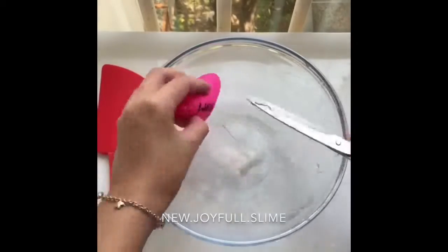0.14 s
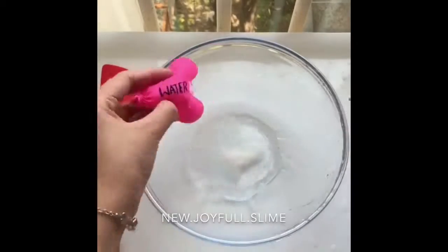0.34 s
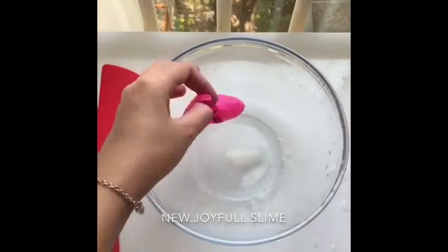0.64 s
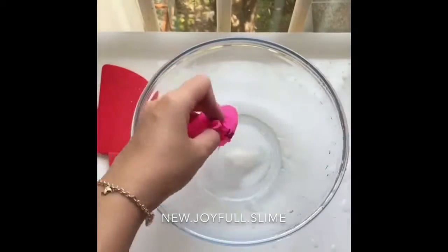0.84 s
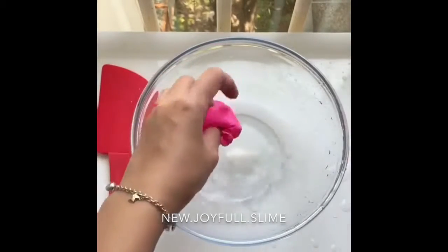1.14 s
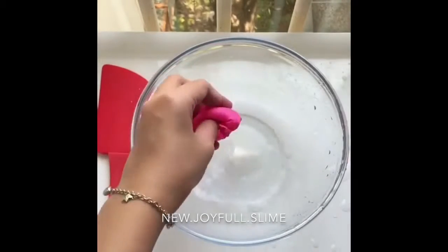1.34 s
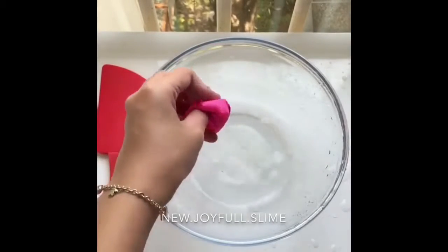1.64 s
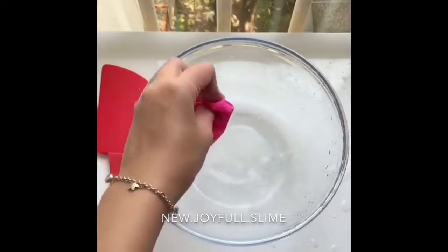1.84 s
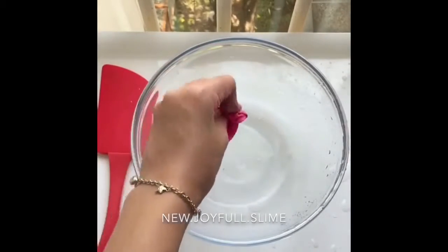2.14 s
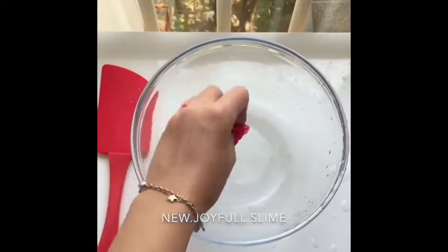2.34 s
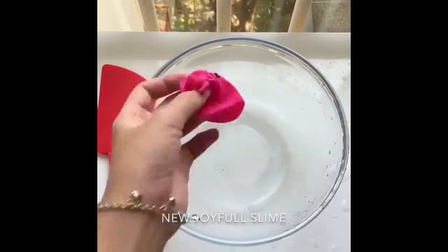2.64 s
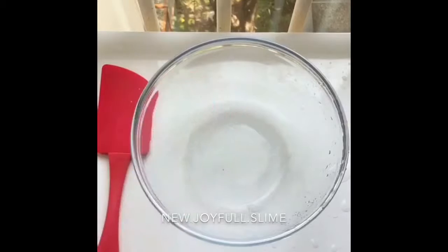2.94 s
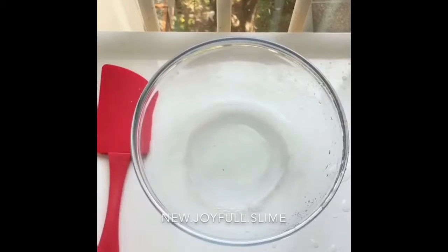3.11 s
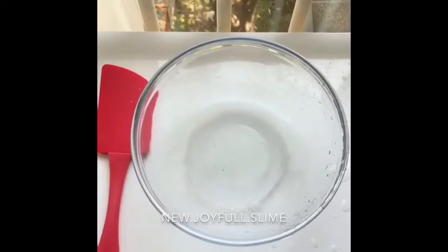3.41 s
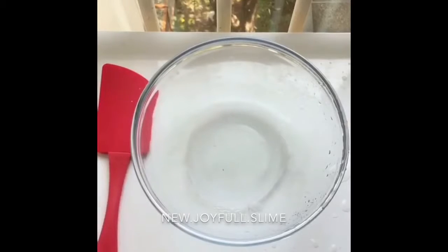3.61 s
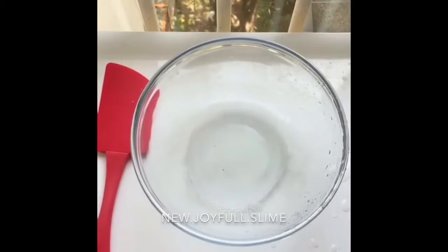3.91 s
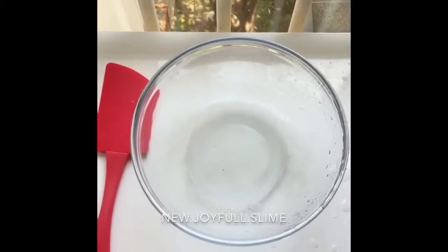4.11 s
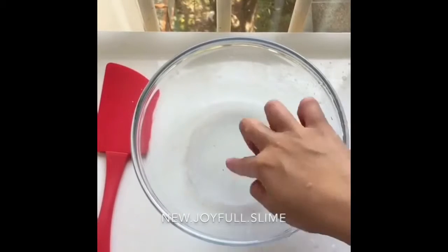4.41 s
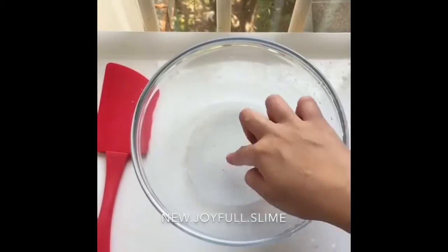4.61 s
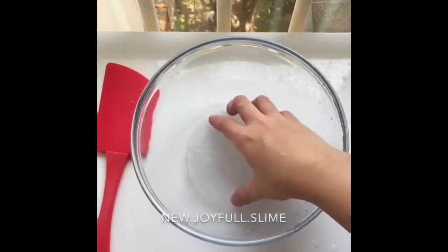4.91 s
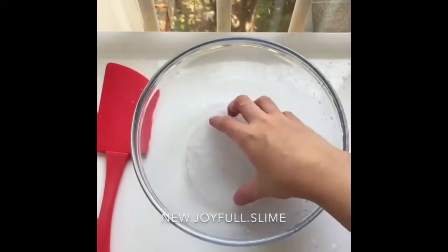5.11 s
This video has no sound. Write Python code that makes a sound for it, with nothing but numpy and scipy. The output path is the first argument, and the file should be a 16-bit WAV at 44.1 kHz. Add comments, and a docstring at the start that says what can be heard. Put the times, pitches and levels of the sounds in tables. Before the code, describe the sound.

A sharp snip releases a quick bubbly gush of water, then fizzy squelching squeezes, hard knocks on table and glass bowl, and brief hand rustles over a faint hum.

```python
"""In a small humming room, scissors snip a water-filled rubber ball over a glass bowl.
A gush of filtered noise carries a few loud bubbles, each a swelling, rising tone; then each squeeze
of the emptying skin presses out fizz (a swarm of tiny bubbles) and noise spits. Hard knocks ring modes
of table and bowl, soft bumps those of the table; a hand rustles and things slide as grainy noise."""
import sys
import numpy as np
from scipy import signal
from scipy.fft import irfft
from scipy.io import wavfile
from scipy.ndimage import uniform_filter1d

SR = 44100
rng = np.random.default_rng(int(sys.argv[2]) if len(sys.argv) > 2 else 0)


def int16_out(signal):
    """Quantize to a 16-bit WAV file."""
    q = np.round(np.clip(np.atleast_2d(signal).T, -1, 1) * 32767)
    wavfile.write(sys.argv[1], SR, q.astype(np.int16))


N = 231820
TIME_S = np.arange(N) / SR

# room noise spectrum: (frequency [Hz], relative level [dB])
AIR_SPECTRUM = [(30, 11), (55, -2.5), (80, 3.5), (160, 5), (210, -3.5), (330, 1), (470, -11.5), (800, -13),
                (1100, -21), (1500, -19), (2200, -20.5), (3300, -27), (6000, -31.5), (13500, -35.5)]
# motor tones: (multiple of motor speed, level [dB])
MOTOR_TONES = [(1, -55.5), (3, -67), (4, -56), (5, -61.5), (6, -82.5), (7, -73.5), (12, -69.5)]
# reverberation of the room: (frequency [Hz], t60 [s])
ROOM_DECAY = [(150, 0.13), (400, 0.3), (900, 0.17), (3000, 0.16), (8000, 0.1), (14000, 0.096)]
# crisp brushes of a hand: (time [s], level [dB], t60 [s], centre [Hz], half-width [octaves])
RUSTLES = [(3.619, -36, 0.055, 4000, 0.94), (3.822, -56, 0.025, 2970, 1), (3.9, -63, 0.45, 6500, 1.5),
           (4.2865, -28.5, 0.05, 8500, 3.5), (4.316, -35, 0.044, 10000, 1.1),
           (4.3262, -25, 0.036, 9200, 1.94), (4.3815, -30, 0.028, 10000, 1.8), (4.413, -46, 0.1, 8050, 2.6)]
# dull scrapes of things sliding on the table: (time [s], level [dB], t60 [s], centre [Hz])
SLIDES = [(.833, -42, 0.14, 375), (3.822, -37, 0.019, 550), (3.872, -44, .16, 565),
          (3.905, -49.5, 0.16, 626)]
# modes of the table top: (frequency [Hz], level [dB], t60 [s])
TABLE_MODES = [(97, -6, 0.061), (171.5, -12.5, 0.098), (234, -12, 0.062), (255.3, 0, 0.11),
               (296, -7, 0.049), (355.7, -4, 0.068), (420.4, -7, 0.051), (503, -16.5, 0.049),
               (701, -20.5, 0.14), (1097, -6.5, 0.061), (1340, 3.5, 0.026)]
# modes of the glass bowl: (frequency [Hz], level [dB], t60 [s])
BOWL_MODES = [(860, 2.5, 0.28), (1060, -8, 0.42), (1148, -14, 0.23), (1376, -12.5, 0.12),
              (1964, -1.5, 0.074), (2444, -13, 0.15)]
# soft bumps against the table: (time [s], thud level [dB], pitch [Hz], t60 [s], table level [dB])
BUMPS = [(3.571, -16.5, 110.6, 0.1, -23), (4.499, -18.5, 121, 0.099, -37), (4.522, -27, 159.6, 0.16, -36.5)]
# frequencies at which the clack levels of a knock are given: (frequency [Hz])
CLACK_HZ = [500, 1100, 3000, 10000]
# hard knocks on bowl or table: (time [s], four clack levels [dB] at CLACK_HZ, notch spacing [Hz],
# hollow resonance [Hz], its lift [dB], t60 [s], table level [dB], bowl level [dB])
KNOCKS = [(0.239, -11.5, -27.5, -50, -38, 2950, 716, 8.5, 0.093, -32.5, -40),
          (1.1042, -15.5, -22.5, -31.5, -47.5, 1700, 2060, 3, 0.042, -29.5, -45.5),
          (1.222, -15.5, -27.5, -31.5, -48, 1730, 1400, 6, 0.02, -47, -56),
          (2.7114, -10.5, -14, -18, -31, 1650, 2000, 2, 0.052, -14.5, -68),
          (2.9488, -7, -16, -22.5, -40, 2090, 3060, 5.5, 0.046, -25, -53),
          (3.0618, 2, -11.5, -16, -38, 1650, 1260, 10.5, 0.068, -6.5, -61),
          (4.0454, 0.5, -15, -18, -39.5, 1850, 2010, 18, 0.037, -51, -38.5)]
# slosh and flop of the rubber skin: (time [s], level [dB], t60 [s], centre [Hz])
SLOSHES = [(.115, -40.5, 0.25, 183), (.16, -33.5, 0.071, 262), (0.241, -39, 0.34, 157),
           (0.419, -42, 0.09, 188), (1.97, -47.5, 0.95, 179)]
# gush as the skin gives way: (time [s], level [dB], t60 [s], centre [Hz], half-width [octaves])
GUSH = [(.108, -24, 0.056, 6950, 1.5), (.1175, -10, 0.022, 4200, 2.2), (.125, -24, 0.18, 5400, 1.7),
        (.125, -27, 0.21, 2610, 0.28), (.161, -25, 0.062, 4160, 0.98)]
# spits of air and water from the cut: (time [s], level [dB], centre [Hz], half-width [octaves])
SPITS = [(.231, -39, 10000, .42), (0.432, -34.5, 1720, 1.06), (.451, -29, 3700, 1.04),
         (0.468, -32.5, 4030, 0.55), (.483, -31, 11700, 0.4), (.519, -35, 3150, 0.68),
         (1.229, -33, 12000, 0.16), (1.2397, -27, 12200, 0.14), (1.806, -29.5, 11000, 1.3),
         (1.936, -36, 7860, 1.3), (1.977, -31, 6460, 0.74), (1.9925, -26, 7900, 0.42),
         (2.0224, -36.5, 10000, 1.2), (2.257, -45, 3630, 0.8)]
# squeezes of the hand: (start [s], length [s], fizz level [dB], typical bubble pitch [Hz])
SQUEEZES = [(0.07, 0.066, -53, 6500), (0.213, 0.084, -49.5, 6000), (0.31, 0.023, -46, 7600),
            (0.358, 0.085, -57.5, 4930), (0.447, 0.03, -46, 4950), (0.715, 0.015, -50, 3670),
            (0.886, 0.019, -51, 7460), (0.924, 0.097, -62.5, 6000), (1.237, 0.012, -41.5, 12100),
            (1.28, 0.071, -57, 11500), (1.364, 0.016, -45, 5140), (1.452, 0.06, -50, 13500),
            (1.516, 0.055, -50.5, 8700), (1.6, 0.062, -55.5, 9050), (1.737, 0.29, -48, 9200),
            (1.892, .085, -40, 6250), (2.02, 0.056, -54, 6900), (2.132, 0.022, -57.5, 5800),
            (2.266, 0.021, -54, 3430), (2.471, 0.027, -57.5, 8000)]
# ringing notes of the glass bowl: (time [s], level [dB], pitch [Hz], swell time [s])
GLASS_NOTES = [(.242, -40, 4360, .019), (.24, -38, 2446, .022), (.24, -41.5, 1050, .016),
               (.485, -55, 4390, .03)]
# loudest air bubbles in the water: (time [s], level [dB], starting pitch [Hz])
BUBBLES = [(.109, -11.5, 3845), (0.1155, -12, 2627), (0.124, -18, 3000), (0.1625, -14.5, 2480),
           (0.182, -31, 2740), (0.4287, -37.5, 1757), (.459, -30, 3220), (1.326, -39, 7740),
           (1.371, -29, 3490), (1.531, -39.5, 4600), (1.58, -39, 7360), (1.779, -38, 3390),
           (1.8093, -26.5, 6600), (1.853, -23.5, 7500), (1.876, -30, 8200), (1.91, -35.5, 1886),
           (1.928, -44, 2610), (1.942, -28, 3900), (1.948, -25.5, 5960), (1.9562, -11, 12900),
           (1.975, -18.5, 7650), (1.983, -29.5, 4060), (2.055, -38, 3230), (2.086, -38, 4680)]
# bubbles as the ball empties: (time [s], swell [cycles], pitch rise per swell time [fraction])
EMPTYING = [(.1, 10.6, 0.005), (2.0, 5.4, 0.07)]

AIR_DB = -45.5
MOTOR_HZ, DRONE_HZ, DRONE_DB = 71.72, 95.95, -45  # the drone is the appliance's loudest tone
RUSTLE_RISE_PER_T60 = 0.024
SLIDE_RISE_PER_T60, SLIDE_OCTAVES = 0.086, 0.46
NOTCH_DEPTH = 0.8
SLOSH_RISE_PER_T60, SLOSH_OCTAVES = 0.1, 0.62
GUSH_RISE_PER_T60 = 0.034
SPIT_RISE_S, SPIT_T60_S = 0.0005, 0.015
SQUEEZE_RISE_S, SQUEEZE_T60_S = 0.003, 0.14
# the finer the fizz, the more alike its bubbles are in size
FINEST_HZ, SIZE_SPREAD, WIDEST_OCTAVES = 16900, 1.8, 1.84
# low notes of the glass swell a second time
LINGER_DB, LINGER_S, LINGER_BELOW_HZ = -13, 0.052, 3000
SCATTER_T60_S = 0.032
FIZZ_ECHO_DB, SPURT_ECHO_DB, BUBBLE_ECHO_DB = -8, -8.5, -12
MIC_LOW_HZ, MIC_HIGH_HZ = 62, 14050


def gain_of(db):
    """Decibels to amplitude."""
    return 10 ** (np.asarray(db) / 20)


def evened(x):
    """Scales to rms 1."""
    return x / np.sqrt(np.mean(x ** 2) + 1e-20)


def read(points, hz):
    """Reads a curve on a log-frequency axis."""
    point_hz, value = np.transpose(points)
    return np.interp(np.log(hz + 1), np.log(point_hz + 1), value)


def band(hz, centre_hz, octaves):
    """A soft bell on a log-frequency axis."""
    offset = np.log2((hz + 1) / centre_hz) / (2 * octaves)
    return 1 / (1 + offset ** 2) ** 4


def add(mix, time_s, sound):
    """Mixes a sound in at time_s."""
    part = mix[max(round(time_s * SR), 0):][:len(sound)]
    part += sound[:len(part)]


def soft_onset(t, rise_s):
    """Build-up from 0 to 1 that starts gently."""
    return 1 - np.exp(-(t / rise_s) ** 2)


def sharp_onset(t, rise_s):
    """Build-up from 0 to 1, steepest at the start."""
    return 1 - np.exp(-t / rise_s)


def noise(gain, size):
    """Noise of random phase whose spectrum is gain(Hz)."""
    hz = np.fft.rfftfreq(size, 1 / SR)
    phase = np.exp(2j * np.pi * rng.random(len(hz)))
    return irfft(gain(hz) * phase, size) * np.sqrt(size)


def swelling(rows, rise_per_t60):
    """Gives each puff a rise time in proportion to its decay."""
    return [(s, db, rise_per_t60 * t60_s, t60_s, *shape) for s, db, t60_s, *shape in rows]


def bursts(rows, grain_db):
    """Puffs of grainy noise, each with its own attack, decay and band."""
    out, t = np.zeros(N), TIME_S[:SR // 3]
    for time_s, db, rise_s, t60_s, centre_hz, octaves in rows:
        hiss = noise(lambda hz: band(hz, centre_hz, octaves), len(t))
        flicker = evened(uniform_filter1d(rng.standard_normal(len(t)), size=45))  # 1 ms grains
        envelope = soft_onset(t, rise_s) * gain_of(-60 * t / t60_s)
        grainy = evened(hiss * gain_of(grain_db * flicker))
        add(out, time_s, gain_of(db) * grainy * envelope / envelope.max())
    return out


def ring(modes, swell_s):
    """Sum of exponentially decaying sine modes with a common build-up."""
    t = TIME_S[:SR // 2]
    tones = sum(gain_of(db - 60 * t / t60_s) * np.sin(2 * np.pi * hz * t) for hz, db, t60_s in modes)
    return tones * soft_onset(t, swell_s)


def bubble(hz, swell_s, rise):
    """A tone that swells, dies away and climbs as the bubble nears the surface."""
    t = TIME_S[:int(8 * swell_s * SR) + 2]
    u = t / swell_s
    envelope = u ** 2 * np.exp(2 - 2 * u)
    return envelope * np.sin(2 * np.pi * hz * t * (1 + rise * u / 2))


def hum(waver=0.023, phase_waver_rad_per_hz=0.0028):
    """Motor tones, slightly wavering in level and phase, over soft room noise."""
    out = evened(noise(lambda hz: gain_of(read(AIR_SPECTRUM, hz)), N)) * gain_of(AIR_DB)
    tones = [(DRONE_HZ, DRONE_DB)] + [(round(k) * MOTOR_HZ, db) for k, db in MOTOR_TONES]
    for hz, db in tones:
        drift = evened(noise(lambda f: np.exp(-f / 0.93), N))  # mostly below a few Hz
        phase = 2 * np.pi * (hz * TIME_S + rng.random()) + phase_waver_rad_per_hz * hz * drift
        out += np.sqrt(2) * gain_of(db) * (1 + waver * drift) * np.sin(phase)
    return out


def room(x):
    """Dense reflections from near walls, each band dying at its own speed."""
    hz, t, z = signal.stft(rng.standard_normal(SR // 2), SR, nperseg=256)
    decay = gain_of(-60 * t / read(ROOM_DECAY, hz)[:, None])
    tail = signal.istft(z * decay, SR, nperseg=256)[1]
    tail *= soft_onset(TIME_S[:len(tail)], 0.0033)
    return signal.fftconvolve(x, tail / np.linalg.norm(tail))[:N]


def handling():
    """A hand brushing past and things sliding on the table, as grainy friction noise."""
    rustles = swelling(RUSTLES, RUSTLE_RISE_PER_T60)
    slides = swelling([(*row, SLIDE_OCTAVES) for row in SLIDES], SLIDE_RISE_PER_T60)
    return bursts(rustles, grain_db=5.0) + bursts(slides, grain_db=5.0)


def bumps(rumble_db=-21, rumble_rise_s=0.0093, rumble_t60_s=0.34, rumble_hz=230, rumble_octaves=0.34):
    """A soft thud rings the low modes of the table and leaves a short rumble."""
    rumble = (rumble_rise_s, rumble_t60_s, rumble_hz, rumble_octaves)
    out = bursts([(s, db + rumble_db, *rumble) for s, db, *_ in BUMPS], grain_db=1.5)
    for time_s, db, hz, t60_s, table_db in BUMPS:
        thud = gain_of(db) * ring([(hz, 0, t60_s)], 0.005)
        add(out, time_s, thud + gain_of(table_db) * ring(TABLE_MODES[:6], 0.0021))
    return out


def knocks(lift_octaves=0.23, tail_db=-16, tail_t60_s=0.22, bass_hz=230, table_swell_s=0.0093,
           rebound_db=-6, rebound_s=0.0096, wall_db=-17.0):
    """A hard clack, hollowed by a quick inverted reflection, rebounds and rings table and bowl."""
    out, t = np.zeros(N), TIME_S[:SR // 2]
    table = ring(TABLE_MODES, table_swell_s)
    bowl = ring(BOWL_MODES, 0.00072)
    for time_s, *colour_db, notch_hz, hollow_hz, lift_db, t60_s, table_db, bowl_db in KNOCKS:
        def plain(hz):
            """Broad colour of the blow, bass reduced."""
            colour = gain_of(read(list(zip(CLACK_HZ, colour_db)), hz))
            return colour * hz ** 2 / (hz ** 2 + bass_hz ** 2)

        def hollow(hz):
            """The same with the struck thing's resonance and notches."""
            lift = lift_db * np.exp(-(np.log2((hz + 1) / hollow_hz) / lift_octaves) ** 2)
            # long waves bend round the reflecting edge
            depth = NOTCH_DEPTH * hz ** 2 / (hz ** 2 + (notch_hz / 2) ** 2)
            notches = abs(1 - depth * np.exp(2j * np.pi * hz / notch_hz))
            return plain(hz) * gain_of(lift) * notches

        clack = noise(hollow, len(t)) * gain_of(-60 * t / t60_s) * sharp_onset(t, 0.0005)
        rattle = noise(plain, len(t)) * gain_of(tail_db - 60 * t / tail_t60_s) * sharp_onset(t, 0.0073)
        rebound = noise(hollow, len(t)) * gain_of(rebound_db - 60 * t / 0.013)
        add(out, time_s, clack + rattle + gain_of(bowl_db) * bowl)
        add(out, time_s + rebound_s, rebound)
        add(out, time_s + 0.00555, gain_of(table_db) * table)  # the heavy top answers late
        add(out, time_s + 0.0257, gain_of(table_db + wall_db) * table)  # a wall returns its boom
    return out


def in_bowl(x, echo_db):
    """The glass wall scatters each splash into a few milliseconds of close echoes."""
    t = TIME_S[:SR // 20]
    echoes = rng.standard_normal(len(t)) * gain_of(-60 * t / SCATTER_T60_S) * sharp_onset(t, 0.00086)
    scattered = signal.fftconvolve(x, echoes / np.linalg.norm(echoes))[:N]
    return (x + gain_of(echo_db) * scattered) / np.sqrt(1 + gain_of(echo_db) ** 2)


def fizz(low_hz=1900, high_hz=13500, pops_per_s=4200, swell_cycles=1.86, spread_db=3.5, clump_db=3.5,
         ring_spread_octaves=0.25):
    """A swarm of tiny bursting bubbles of many sizes; each squeeze builds quickly, holds and lets go."""
    pitches_hz = np.geomspace(low_hz, high_hz, num=40)
    start_s, length_s, db, centre_hz = np.transpose(SQUEEZES)[:, :, None]
    t = np.maximum(TIME_S - start_s, 0)
    release_db = 60 * np.maximum(t - length_s, 0) / SQUEEZE_T60_S
    pressure = sharp_onset(t, SQUEEZE_RISE_S) * gain_of(db - release_db)
    octaves = np.minimum(SIZE_SPREAD * np.log2(FINEST_HZ / centre_hz), WIDEST_OCTAVES)
    share = pitches_hz * band(pitches_hz, centre_hz, octaves) ** 2
    share /= share.sum(axis=1, keepdims=True)
    swarm = np.zeros(N)
    for hz, power in zip(pitches_hz, share.T @ pressure ** 2):
        hits = rng.random(N) < pops_per_s / len(pitches_hz) / SR
        pops = hits * gain_of(spread_db * np.minimum(rng.exponential(1, N), 4))
        # ring length varies a little from pitch to pitch
        swell_s = swell_cycles / hz * 2 ** (ring_spread_octaves * (2 * rng.random() - 1))
        chirps = signal.oaconvolve(pops, bubble(hz, swell_s, 0.022))[:N]
        swarm += np.sqrt(power) * evened(chirps)
    clumps = evened(uniform_filter1d(rng.standard_normal(N), size=200))  # 4.5 ms
    return swarm * evened(gain_of(clump_db * clumps))


def bubbles():
    """Large bubbles ring shorter and chirp faster as the ball empties."""
    out = np.zeros(N)
    when_s, cycles, rise = np.transpose(EMPTYING)
    for time_s, db, hz in BUBBLES:
        swell_s = np.interp(time_s, when_s, cycles) / hz
        add(out, time_s, gain_of(db) * bubble(hz, swell_s, np.interp(time_s, when_s, rise)))
    return out


def glass_notes():
    """Notes of the glass bowl swell and die away at a steady pitch."""
    out = np.zeros(N)
    for time_s, db, hz, swell_s in GLASS_NOTES:
        add(out, time_s, gain_of(db) * bubble(hz, swell_s, 0))
        if hz < LINGER_BELOW_HZ:
            add(out, time_s + LINGER_S, gain_of(db + LINGER_DB) * bubble(hz, LINGER_S, 0))
    return out


def water():
    """Fizz, gush, spits, bubbles and glass notes echo in the bowl while the skin flops."""
    gush = swelling(GUSH, GUSH_RISE_PER_T60)
    spits = [(s, db, SPIT_RISE_S, SPIT_T60_S, hz, octaves) for s, db, hz, octaves in SPITS]
    sloshes = swelling([(*row, SLOSH_OCTAVES) for row in SLOSHES], SLOSH_RISE_PER_T60)
    out = in_bowl(fizz(), FIZZ_ECHO_DB)
    out += in_bowl(bursts(gush + spits, grain_db=2.5), SPURT_ECHO_DB)
    out += in_bowl(bubbles() + glass_notes(), BUBBLE_ECHO_DB)
    return out + bursts(sloshes, grain_db=3.5)


def scene():
    """Hum, handling noises, blows and water in one room."""
    background, hand, blows, wet = hum(), handling(), knocks() + bumps(), water()
    reflected = room(gain_of(-11.5) * wet + gain_of(-4.5) * hand + gain_of(-14.0) * blows)
    return (background + hand + blows + wet + reflected)[None]


def record(dry):
    """The small microphone loses the deep bass; a low-pass limits the treble."""
    dry = signal.sosfilt(signal.butter(7, MIC_LOW_HZ, "highpass", fs=SR, output="sos"), dry)
    lowpass = signal.firwin(255, MIC_HIGH_HZ, window=("kaiser", 8), fs=SR)
    return signal.oaconvolve(dry, lowpass[None], "same")


dry = scene()
out = record(dry)
int16_out(out)
```